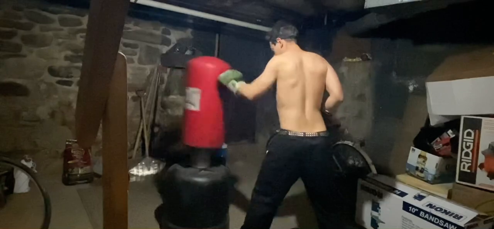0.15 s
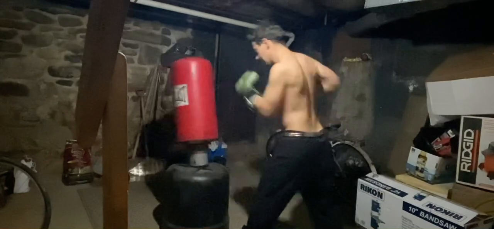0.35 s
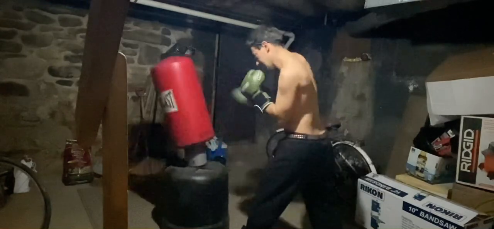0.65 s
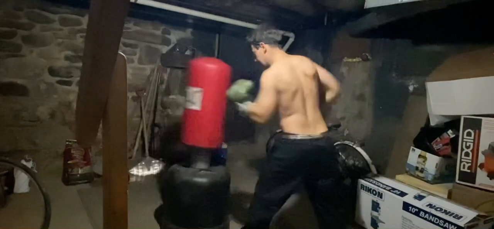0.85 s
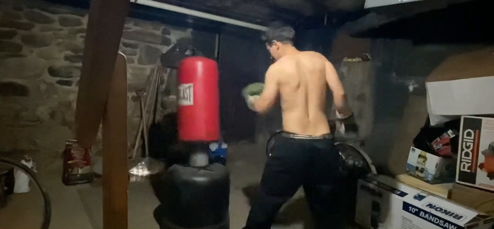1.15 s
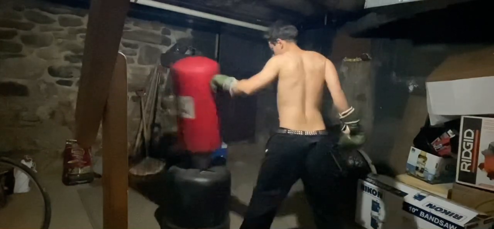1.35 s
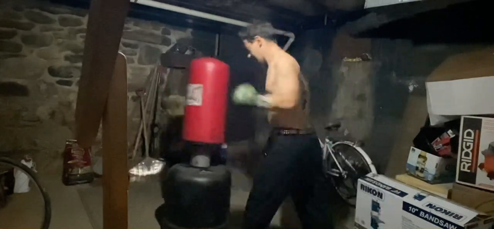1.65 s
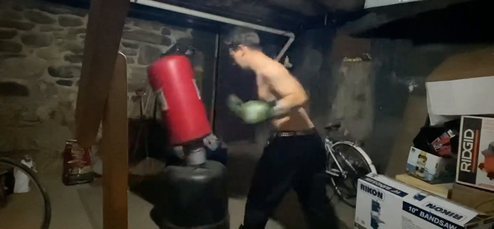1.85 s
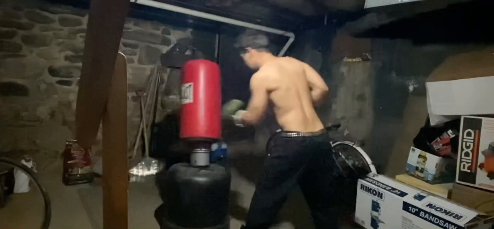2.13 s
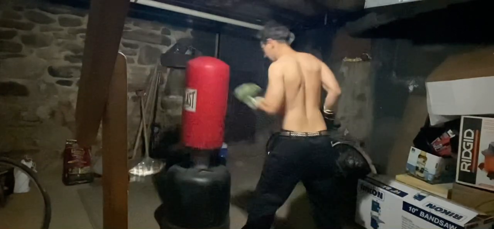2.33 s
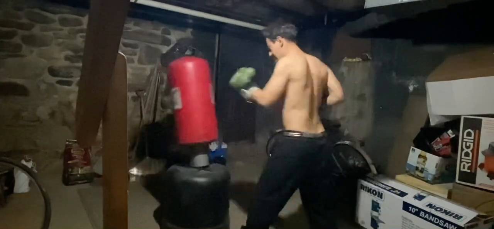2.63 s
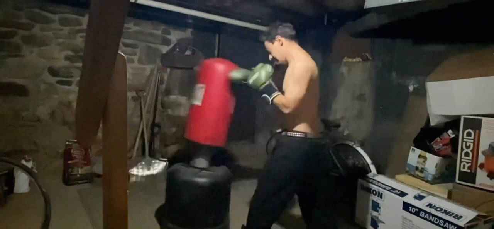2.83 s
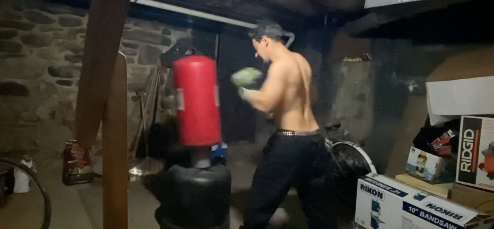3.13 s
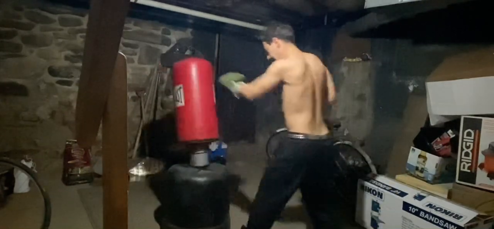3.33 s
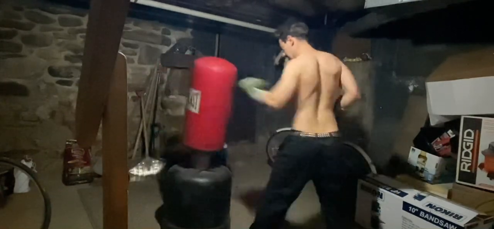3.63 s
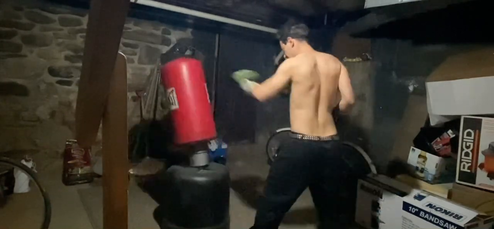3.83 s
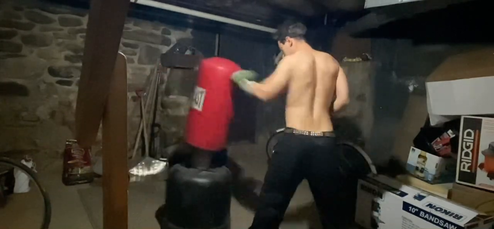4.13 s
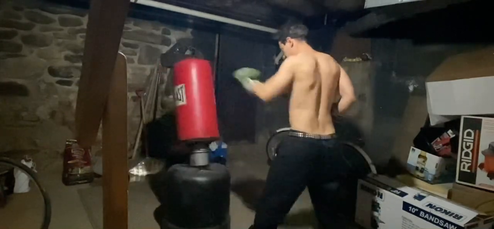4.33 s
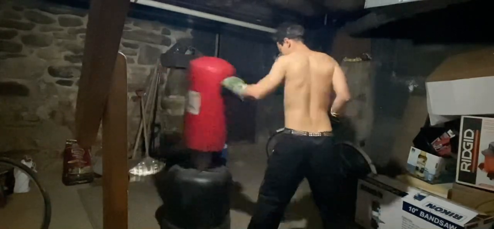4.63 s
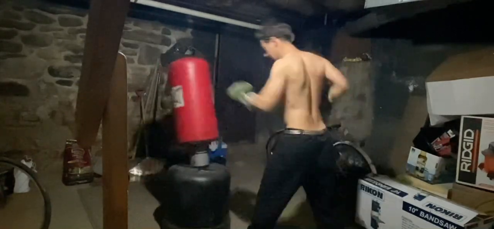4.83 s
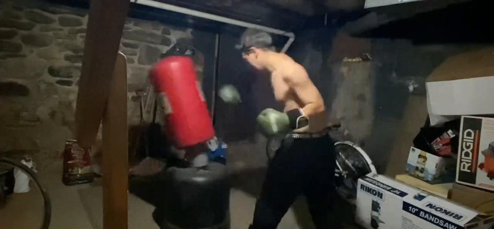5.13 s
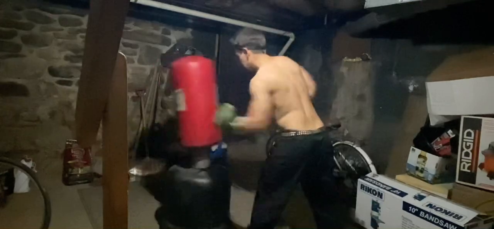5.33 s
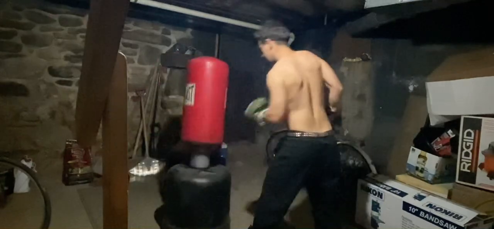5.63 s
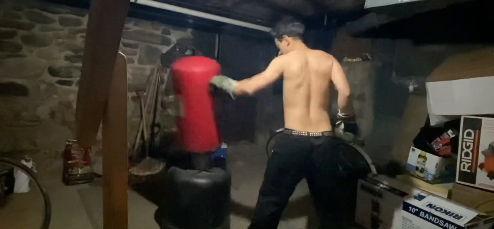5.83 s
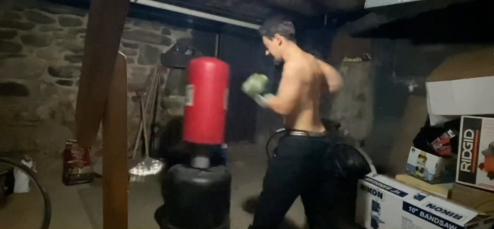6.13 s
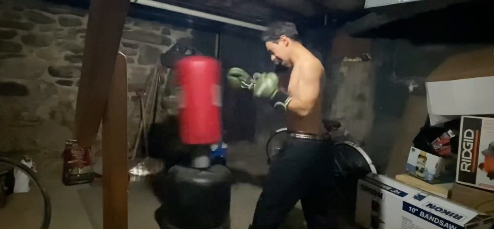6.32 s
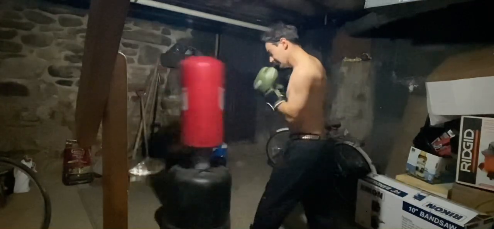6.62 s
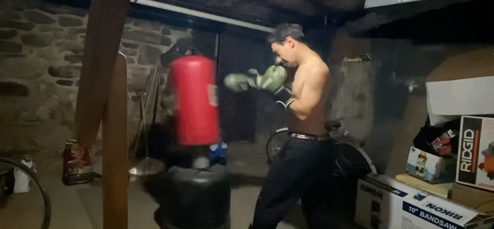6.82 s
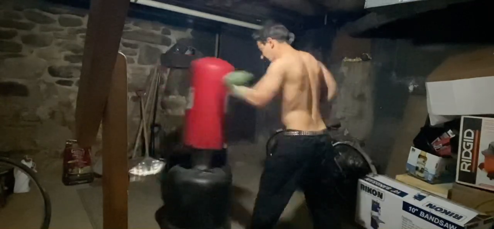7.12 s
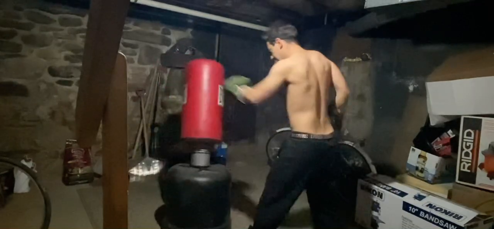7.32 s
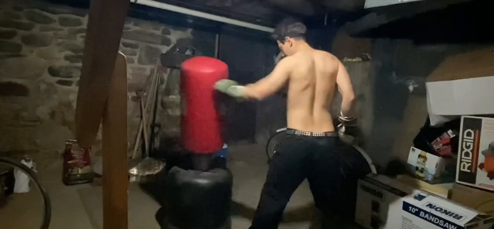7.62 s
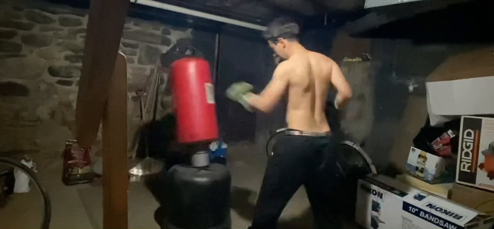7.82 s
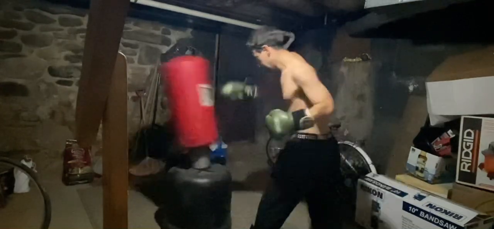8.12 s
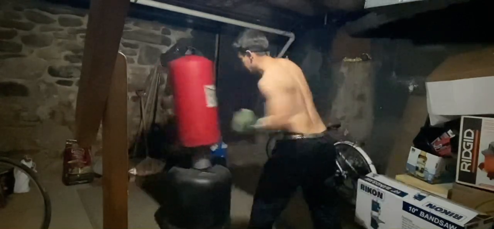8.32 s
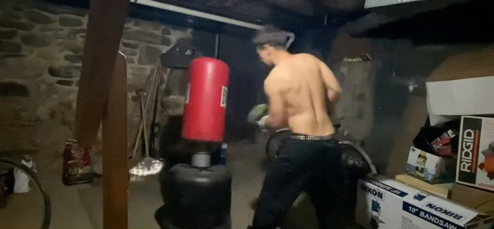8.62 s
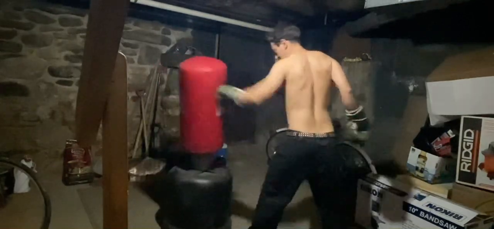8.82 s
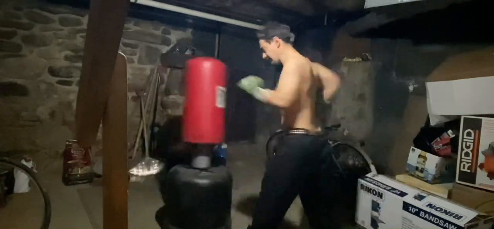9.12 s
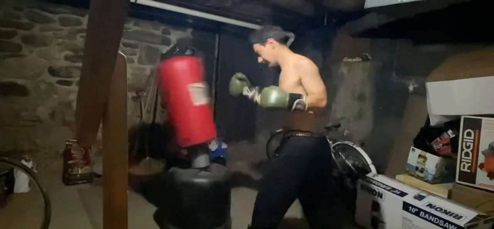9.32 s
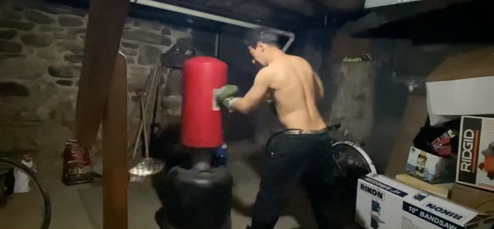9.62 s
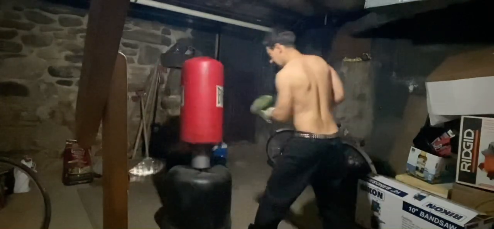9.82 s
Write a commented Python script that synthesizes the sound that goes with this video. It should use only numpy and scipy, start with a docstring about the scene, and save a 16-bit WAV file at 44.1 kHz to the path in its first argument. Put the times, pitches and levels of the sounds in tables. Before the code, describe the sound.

Gloved fists strike a freestanding punching bag in a low, cluttered stone cellar. Plastic knocks and deep base thumps begin at once, soon joined by short leather slaps. The blows come in quick, uneven bunches with tiny gaps, and the hardest crack dry and make the loose plastic neck ring briefly. Each gets a short, dull room answer. Two fairly close microphones hear the bag slightly left, over faint wavering air.

```python
"""Gloved fists beat a free-standing padded bag in a stone cellar, over faint air that wavers all the while.
From the start, plastic knocks and base thumps come in quick bunches: filtered modes of shell, socket and base.
Glove slaps soon join as short noise bursts; the hardest knocks also crack and set the loose neck ringing.
The bunches go on unevenly to the end. Each blow gets a brief answer from the low cluttered room, made of
fading noise; the bag stands left of two microphones, so the right one hears it later."""
import sys
import numpy as np
from scipy import signal
from scipy.fft import rfft, irfft, next_fast_len
from scipy.io import wavfile
from scipy.ndimage import map_coordinates

SR = 44100
rng = np.random.default_rng(int(sys.argv[2]) if len(sys.argv) > 2 else 0)


def wrap_up_sound(samples):
    """Save the sound to the file named by the first command line argument, as 16-bit audio."""
    columns = np.atleast_2d(samples).T
    # keep every value between -1 and 1, then stretch to whole-number steps
    tamed = np.clip(columns, -1, 1)
    steps = np.round(tamed * 32767).astype(np.int16)
    wavfile.write(sys.argv[1], SR, steps)


N = 439220

# All levels are relative; each layer has its own overall level below.
# Faint air of the cellar: (frequency [Hz], level per hertz [dB])
AIR_COLOUR = [(15, -32), (25, -0.5), (65, -0.5), (226, -7), (410, -4), (809, -6.5), (11000, -29),
              (15200, -39), (16500, -67)]
# How long the room rings: (frequency [Hz], time to fall 60 dB [s])
ROOM_DECAY = [(50, 0.24), (130, 0.44), (350, 0.36), (920, 0.29), (2430, 0.31), (6400, 0.26), (14000, 0.18)]
# How alike the two sides are: (frequency [Hz], likeness [0 to 1])
SIDE_LIKENESS = [(60, 1), (150, 0.7), (400, 1), (1000, 0.025), (5000, 0.16), (12000, 0.046)]
# How the left side is raised for the bag: (frequency [Hz], left over right [dB])
LEFT_OVER_RIGHT = [(60, 0.5), (700, 3), (2500, 1), (5000, 2.5), (9000, -0.5)]

# The base lands: (time [s], level [dB])
LANDINGS = [(.013, -16.5), (.078, -20.5), (.344, -20), (.372, -18.5), (.639, -23), (.718, -19), (.789, -23),
            (1.045, -27.5), (1.159, -31), (1.218, -26.5), (1.561, -21.5), (1.87, -14.5), (1.939, -22.5),
            (2.155, -23.5), (2.201, -27.5), (2.307, -26.5), (2.645, -29), (2.719, -22.5), (2.993, -33.5),
            (3.07, -26), (3.113, -19.5), (3.442, -21), (3.582, -27), (3.617, -24.5), (3.875, -28.5),
            (3.939, -24), (4.047, -21.5), (4.119, -23.5), (4.331, -30.5), (4.363, -35), (4.419, -22.5),
            (4.515, -28), (4.581, -25), (4.909, -14.5), (4.974, -21), (5.21, -17), (5.283, -19.5),
            (5.3, -21.5), (5.532, -20), (5.604, -24), (5.657, -23), (6.058, -27), (6.115, -25),
            (6.153, -25.5), (6.433, -18), (6.518, -27), (6.587, -25), (6.671, -26), (6.896, -24.5),
            (6.975, -26), (7.03, -21), (7.08, -30), (7.33, -29.5), (7.36, -28), (7.474, -25), (7.77, -33.5),
            (7.833, -28), (7.885, -16), (7.957, -23.5), (8.195, -17), (8.283, -19), (8.532, -23.5),
            (8.698, -28.5), (9.026, -31), (9.079, -22), (9.169, -28.5), (9.408, -16), (9.49, -22),
            (9.72, -30), (9.797, -25), (9.915, -28.5)]
# Modes of filled base and floor: (frequency [Hz], width [Hz], level [dB])
BASE_MODES = [(44.7, 5.2, -5), (55.8, 28.7, -1.5), (80.6, 57.3, -1), (130.5, 43.8, -3), (178.8, 20.5, -2.5)]

# Leather on vinyl: (time [s], level [dB], treble tilt [dB per octave])
GLOVE_SLAPS = [(.0822, -24, -7), (.366, -7, -6), (.5782, -18, -2), (.7074, -17, -28), (.7764, -16.5, -8.5),
               (1.1953, -18, -5), (1.5546, -14, -3), (1.601, -7.5, -13), (1.7963, -16.5, -2),
               (1.8895, -12.5, -5), (2.192, -34, -11), (2.2527, -16, -17), (2.2867, -22.5, -4),
               (2.631, -29.5, -30), (2.7104, -12.5, -6.5), (3.0864, -13, -7), (3.474, -20.5, -19),
               (3.5553, -16.5, -8), (3.8811, -22.5, -11.5), (3.9208, -31, -9), (4.0234, -16, -8.5),
               (4.1011, -22, -9), (4.42, -19, -10), (4.4903, -22.5, -4.5), (4.5805, -23, -20),
               (4.9027, -7.5, -8), (5.1202, -17, -3.5), (5.2764, -16.5, 2.5), (5.5643, -22, -8),
               (5.691, -24, -6), (6.1135, -9, -5.5), (6.171, -13, -5.5), (6.3712, -17.5, -3.5),
               (6.438, -15.5, -41), (6.5027, -8.5, -15), (6.5794, -21.5, 1), (6.853, -20.5, -2.5),
               (6.9573, -18, -29), (7.0082, -14.5, -3.5), (7.3729, -15, -12), (7.4663, -20, -3.5),
               (7.881, -9.5, -7.5), (7.9534, -27, 4), (8.268, -20, -14), (8.2965, -12, -6),
               (8.609, -9.5, -26), (8.679, -18, -8), (9.0738, -14, -2), (9.1285, -17, -20),
               (9.3053, -34, -5), (9.4602, -26, 4), (9.5138, -22, -9), (9.8018, -22, -15),
               (9.8998, -26, -5)]
# Colour of a slap on vinyl: (frequency [Hz], level [dB])
VINYL_COLOUR = [(300, 6.5), (1000, 2.5), (2500, -2), (4500, 0), (7000, -0.5), (10000, 1), (12300, 4.5),
                (17000, -18)]

# Knocks of neck and shell, each with its own chatter:
# (time [s], shell level [dB], clack level above the shell [dB])
KNOCKS = [(.002, -11, -10.5), (.048, -21, -1), (.061, -5.5, -16), (.078, -10, -10), (.098, -15, -9),
          (.281, -20.5, -14), (.331, -18, -11.5), (.348, -11, -17), (.382, -5.5, -9), (.404, -7.5, -10.5),
          (.648, -18.5, -14), (.718, -5, -16.5), (.746, -9, -38), (.788, -12.5, -7), (1.049, -21.5, -7.5),
          (1.108, -16.5, -12), (1.151, -17, -11), (1.2, -10.5, -13), (1.555, -10.5, -5.5),
          (1.587, -5.5, -6), (1.862, -23, -10), (1.895, -9, -12.5), (1.963, -12, -15), (2.153, -12, -21),
          (2.192, -17, -6.5), (2.205, -13, -15.5), (2.257, -14.5, -10.5), (2.29, -15, -11),
          (2.576, -33, -33), (2.632, -17.5, -16), (2.712, -9.5, -12), (3.006, -31, -10.5),
          (3.061, -9, -16.5), (3.082, -4, -15.5), (3.124, -22.5, 3.5), (3.144, -9.5, -8),
          (3.418, -11, -14.5), (3.451, -10.5, -11), (3.474, -23, -3), (3.559, -11.5, -29), (3.587, -33, -1),
          (3.627, -10, -10.5), (3.872, -15.5, -24), (3.925, -10.5, -14.5), (3.981, -16, -13),
          (4.024, -10, -17), (4.051, -13.5, -11.5), (4.1, -11, -3.5), (4.123, -7.5, -18),
          (4.33, -25.5, -12), (4.355, -17.5, -10.5), (4.388, -9.5, -21), (4.422, -9.5, -6.5),
          (4.494, -12.5, -12), (4.53, -26, -5), (4.568, -17.5, -5.5), (4.582, -11.5, -11),
          (4.81, -18, -20.5), (4.85, -15.5, -11.5), (4.903, -7, -9.5), (4.939, -8, -8.5),
          (4.964, -10, -10.5), (5.213, -11, -14), (5.277, -9, -6.5), (5.296, -2, -12), (5.312, -15, -16),
          (5.53, -12, -16), (5.567, -7.5, -14.5), (5.588, -3, -15.5), (5.694, -17, -13),
          (6.049, -16.5, -17.5), (6.114, -6, -17), (6.164, -5, -3), (6.176, -11, -28), (6.437, -11.5, -10),
          (6.505, -5, -8), (6.522, -11, -24), (6.584, -8.5, -10), (6.669, -7, -16), (6.898, -16.5, -15.5),
          (6.961, -3, -18.5), (7.007, -12.5, -5.5), (7.035, -17.5, -12), (7.062, -16, -9),
          (7.278, -29, -12.5), (7.331, -10, -20.5), (7.373, -8.5, -12), (7.47, -13, -15.5),
          (7.785, -30, -17), (7.806, -19.5, -14), (7.839, -9.5, -19), (7.881, -6, -7.5),
          (7.93, -1.5, -10.5), (7.997, -18, -30), (8.199, -16, -14), (8.255, -23, -2), (8.269, -2, -8),
          (8.297, -8, -1), (8.33, -16, -25), (8.531, -9, -19), (8.565, -9, -16.5), (8.609, -9.5, -10.5),
          (8.683, -16, -25), (8.988, -25.5, -34), (9.021, -20.5, -21), (9.075, -7.5, -9),
          (9.126, -8.5, -8.5), (9.412, -20, -12), (9.462, -13, -6), (9.486, -1, -14), (9.706, -26.5, -7),
          (9.75, -11, -19), (9.801, -11, -2.5), (9.902, -16.5, -16)]
# Modes of the hollow shell: (frequency [Hz], width [Hz], level [dB])
SHELL_MODES = [(267, 99, -13), (339.2, 31, -6.5), (407.3, 67, -3), (517.5, 148, -6.5), (626.5, 53, -4),
               (890, 318, -13.5)]
# Modes of the damped socket: (frequency [Hz], width [Hz], level [dB])
SOCKET_MODES = [(960, 130, 10), (1397, 120, 8.5), (1830, 120, 6.5), (2400, 130, 0), (2000, 2000, -7),
                (3900, 200, -8), (4850, 200, -10), (5000, 5000, -17)]

# Hard knocks that crack dry and ring the neck: (time [s], ring level [dB], favoured frequency [Hz],
# reach to other modes [log ratio], crack level [dB], crack tilt [dB per octave])
HARD_KNOCKS = [(.06, -17, 1880, 0.095, -2, -5), (.384, -11.5, 1770, 0.088, -11, 15),
               (.716, -5, 925, 0.23, -1, 0), (1.589, -4, 1800, 0.15, -22, 13),
               (3.087, -20, 1860, 0.36, -22, -4), (3.142, -13, 1780, 0.11, -18, 8),
               (3.626, -9, 920, 0.36, -19, 9), (4.101, -9, 1670, 0.037, -26, 0),
               (4.422, -30, 2100, .3, -1.5, -9), (4.903, -31, 1860, .4, -22, 5),
               (5.295, -17, 1780, 0.23, -1, 9), (5.312, -29, 1365, .3, -6, -12),
               (6.172, -0.5, 1500, 1.6, -11, 0), (6.504, -10, 930, 0.31, 5, 1),
               (6.67, -22, 1840, 0.21, -2, -11), (6.961, -13, 906, 0.44, -1, -8),
               (7.372, -13, 1880, 0.19, -10, -4), (7.931, -2, 908, 0.2, 3.5, 3),
               (8.271, -29, 1860, .5, -9, -3), (8.299, -15, 1450, 0.22, -18, 4),
               (8.378, -24, 1340, 0.16, -18, -3), (9.124, -10.5, 1370, 0.21, -10.5, 12.5),
               (9.487, -25, 1365, 0.37, -23, -7)]
# Modes of the plastic neck: (frequency [Hz], width [Hz], level [dB])
NECK_MODES = [(906, 10, 7), (995, 14, 1), (1365, 13, 0), (1772, 34, -3), (1860, 26, -1), (1985, 40, -5),
              (2378, 11, 6), (2910, 12, -4), (3800, 45, -12), (4310, 40, -14), (4885, 40, -13)]
# Colour of plastic cracking on plastic: (frequency [Hz], level [dB])
CRACK_COLOUR = [(300, -5.5), (800, 15.5), (1800, 9.5), (2800, -2), (3600, -22), (5000, -27), (12000, -59)]

SPAN = 3 * 2 ** 13  # samples worked out for each blow and its room
HZ = np.fft.rfftfreq(SPAN, 1 / SR)
TOP_HZ = 16800  # band limit of the whole sound
ROCK_HZ, ROCK_SPREAD = 100, 0.032  # pitch a landing favours; its scatter as the rim meets new floor points
CLACK_HZ, HARDER = 12900, 0.31  # treble limit of a clack as loud as the shell; how far weaker ones soften
FAR_DB, SLOWER = -33, 4  # far end of the cellar: level, how many times slower it dies
# room on each layer [dB]
BASE_WET_DB, SLAP_WET_DB, SHELL_WET_DB = -4.0, -14, -0.5
CLACK_WET_DB, CRACK_WET_DB, RING_WET_DB = -6, -14, -16


def amp(db):
    """Decibels to gain."""
    return 10 ** (np.asarray(db) / 20)


def along(points, hz):
    """Read a value between (frequency, value) points, spaced by pitch."""
    f, v = np.transpose(points)
    return np.interp(np.log(hz + 1), np.log(f + 1), v)


def stereo_turn(hz):
    """Angle for mixing two independent noises into sides of the wanted likeness."""
    return np.arccos(np.clip(along(SIDE_LIKENESS, hz), -1, 1)) / 2


def causal(gain):
    """The response that has this gain and starts at the blow, not before it."""
    cepstrum = irfft(np.log(gain + 1e-6), SPAN)[:SPAN // 2]
    cepstrum[1:] *= 2
    return np.exp(rfft(cepstrum, SPAN))


def ringing(modes, scatter_db, flex=0):
    """Modes struck with new strengths; a body that flexes shifts their pitches a little."""
    centre, width, db = np.transpose(modes)[:, :, None]
    centre = centre * np.exp(flex * rng.standard_normal(centre.shape))
    sign = (-1.) ** np.arange(len(modes))[:, None]
    gain = sign * amp(db + scatter_db * rng.standard_normal(db.shape))
    resonance = 1j * HZ * width / (centre ** 2 - HZ ** 2 + 1j * HZ * width)
    return np.sum(gain * resonance, axis=0)


def damped(modes, scatter_db, flex):
    """Broad overlapping modes whose powers add, new in strength and pitch at each knock."""
    centre, width, db = np.transpose(modes)[:, :, None]
    shift, size = rng.standard_normal((2, *centre.shape))
    centre = centre * np.exp(flex * shift)
    damping = (HZ * width) ** 2
    strength = amp(2 * (db + scatter_db * size))  # doubled dB: power
    power = strength * damping / ((centre ** 2 - HZ ** 2) ** 2 + damping)
    return causal(np.sqrt(np.sum(power, axis=0)))


def favour(modes, hz, reach):
    """Where a blow lands favours the modes near one pitch."""
    return [(c, w, level - 6 * (np.log(c / hz) / reach) ** 2) for c, w, level in modes]


def soft(hz):
    """A padded contact lasts a while and carries little above hz."""
    return 1 / (1 + 1j * HZ / hz) ** 2


def chatter(length_s, rate, spread_db):
    """A first touch, then sparse uneven rebounds that fall 20 dB in length_s."""
    t = np.arange(SR // 8) / SR
    hit, size = rng.random((2, len(t)))
    level_db = -2 - spread_db * size - 20 * t / max(length_s, .002)
    taps = (hit < rate / SR) * amp(level_db)  # rate: mean rebounds a second
    taps[0] = 1
    return rfft(taps, SPAN)


def puff(t60, rise_s):
    """Air and padding squeezed for a moment: a short burst of noise."""
    t = np.arange(SR // 10) / SR
    swell = amp(-60 * t / t60) * (1 - np.exp(-t / rise_s))
    return rfft(rng.standard_normal(len(t)) * swell, SPAN)


def add(out, s, parts, tail):
    """Each (dB, body, touch, room dB) part: the touch heard directly, the body's colour spread by the room."""
    blow = 0
    for db, body, touch, wet_db in parts:
        direct = touch / np.sqrt(np.mean(np.abs(touch) ** 2))
        heard = body * (direct + amp(wet_db) * tail)
        blow = blow + amp(db) * heard / np.sqrt(np.mean(np.abs(heard) ** 2))
    out[:, round(s * SR):][:, :SPAN] += irfft(blow, SPAN)


def hush():
    """The faint air of the cellar: noise wavering slowly, nearly the same on both sides in the bass."""
    m = next_fast_len(N)
    hz = np.fft.rfftfreq(m, 1 / SR)
    turn = stereo_turn(hz)
    noise = rfft(rng.standard_normal((2, m))) * amp(along(AIR_COLOUR, hz))
    shared, opposed = irfft(noise * [np.cos(turn), np.sin(turn)], m)[:, :N]
    waver = map_coordinates(rng.standard_normal(70), [np.arange(N) * 6 / SR])  # six new points a second
    sides = np.array([shared + opposed, shared - opposed])
    return amp(-52.5 + 3 * waver) * sides / np.std(sides[0])


def cellar(tail_db, gap_s, far_db, slower):
    """One draw of the room's fading noise, after a gap; the far end of the cellar dies more slowly."""
    hz, t, z = signal.stft(rng.standard_normal((2, SPAN * 3 // 4)), SR, nperseg=512)
    fall_db = -60 * t / along(ROOM_DECAY, hz)[:, None]
    fading = z * (amp(fall_db) + amp(far_db + fall_db / slower))
    tail = signal.istft(fading, SR, nperseg=512)[1]
    delay = np.exp(-2j * np.pi * HZ * gap_s)
    a, b = rfft(tail / np.linalg.norm(tail[0]), SPAN) * delay
    turn = stereo_turn(HZ)
    shared, opposed = np.cos(turn) * a, np.sin(turn) * b
    return amp(along(tail_db, HZ)) * np.array([shared + opposed, shared - opposed])


def base(rooms, early_s):
    """The filled base thumps the floor; the thump swells for a moment before it peaks."""
    out = np.zeros((2, N + SPAN))
    for k, (s, db) in enumerate(LANDINGS):
        hz = ROCK_HZ * np.exp(ROCK_SPREAD * rng.standard_normal())
        thump = ringing(favour(BASE_MODES, hz, reach=1.0), scatter_db=0.0) * soft(hz=284)
        start_s = max(s - early_s, 0)  # leaves time for the swell
        add(out, start_s, [(db + 32.5, thump, 1, BASE_WET_DB)], rooms[k % len(rooms)])
    return out[:, :N]


def gloves(rooms, echo_s):
    """Leather cracks on vinyl, echoes off the low ceiling and crinkles briefly; flat hits are brighter."""
    out = np.zeros((2, N + SPAN))
    echo = 1 + .5 * np.exp(-2j * np.pi * HZ * echo_s)
    for k, (s, db, tilt_db) in enumerate(GLOVE_SLAPS):
        crack = echo * puff(t60=.003, rise_s=.0002)
        crinkle = chatter(length_s=.03, rate=400, spread_db=14) * puff(t60=.004, rise_s=.0003)
        smack = crack + .1 * crinkle
        octaves = np.clip(np.log2(HZ / 4500 + 1e-9), -.5, 1.2)  # the tilt acts only around 4500 Hz
        colour = causal(amp(along(VINYL_COLOUR, HZ) + tilt_db * octaves))
        add(out, s, [(db + 14.5, colour, smack, SLAP_WET_DB)], rooms[k % len(rooms)])
    return out[:, :N]


def neck(rooms):
    """The hardest knocks crack plastic on plastic and ring the neck's narrow modes."""
    out = np.zeros((2, N + SPAN))
    for k, (s, ring_db, hz, reach, crack_db, tilt_db) in enumerate(HARD_KNOCKS):
        snap = puff(t60=0.022, rise_s=0.001)
        tilt = tilt_db * np.log2(HZ / 1500 + 0.21)  # the offset limits it in the bass
        crack = causal(amp(along(CRACK_COLOUR, HZ) + tilt))
        ring = ringing(favour(NECK_MODES, hz, max(reach, .05)), scatter_db=1.5, flex=.004)
        rattle = chatter(length_s=.02, rate=150, spread_db=10)
        parts = [(crack_db + 12.0, crack, snap, CRACK_WET_DB),
                 (ring_db + 15, ring, rattle, RING_WET_DB)]
        add(out, s, parts, rooms[k])
    return out[:, :N]


def shell_and_socket(rooms):
    """Every knock drives the hollow shell and clacks in the socket; weaker clacks are softer contacts."""
    out = np.zeros((2, N + SPAN))
    for k, (s, db, clack_db) in enumerate(KNOCKS):
        taps = chatter(length_s=0.064, rate=220, spread_db=14.5)
        hardness = amp(HARDER * clack_db)  # a harder contact is brighter and shorter
        shell = ringing(SHELL_MODES, scatter_db=3, flex=0.045) * soft(hz=820)
        socket = damped(SOCKET_MODES, scatter_db=2.0, flex=0.063) * soft(hz=CLACK_HZ * hardness)
        clack = taps * puff(t60=0.0037 / hardness, rise_s=0.00033 / hardness)
        parts = [(db + 21.0, shell, taps, SHELL_WET_DB),
                 (db + clack_db + 20, socket, clack, CLACK_WET_DB)]
        add(out, s, parts, rooms[k % len(rooms)])
    return out[:, :N]


def placed(x, lead_s):
    """The left microphone hears the bag earlier, and louder at most pitches."""
    m = next_fast_len(N + 4096)
    hz = np.fft.rfftfreq(m, 1 / SR)
    left_gain = amp(along(LEFT_OVER_RIGHT, hz))
    right_delay = np.exp(-2j * np.pi * hz * lead_s)
    return irfft(rfft(x, m) * [left_gain, right_delay], m)[:, :N]


def scene():
    """Base, gloves and bag in their room over the faint air."""
    tail_db = [(60, 12.5), (500, 0.83), (8000, 16.0)]  # (frequency [Hz], room level [dB])
    rooms = [cellar(tail_db, gap_s=.003, far_db=FAR_DB, slower=SLOWER) for _ in range(26)]
    struck = base(rooms, early_s=0.00475) + gloves(rooms, echo_s=0.0018)
    struck = struck + neck(rooms) + shell_and_socket(rooms)
    return hush() + placed(struck, lead_s=0.000455)


def record(dry):
    """Peaks round off near full scale; then everything above the band limit is removed."""
    x = dry / (1 + np.abs(dry) ** 6) ** (1 / 6)
    m = next_fast_len(N + 4096)
    in_band = np.fft.rfftfreq(m, 1 / SR) < TOP_HZ
    return irfft(rfft(x, m) * in_band, m)[:, :N]


dry = scene()
out = record(dry)
wrap_up_sound(out)
```